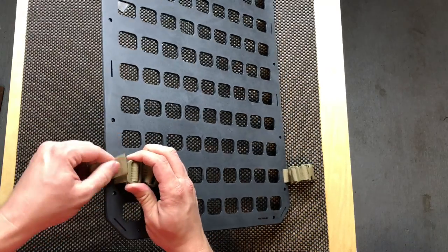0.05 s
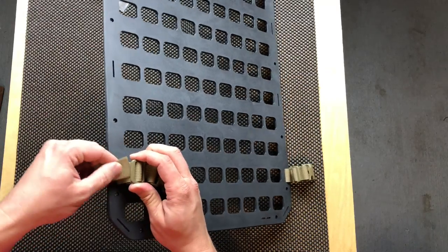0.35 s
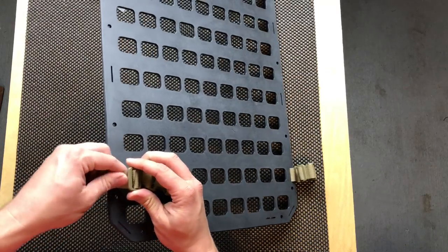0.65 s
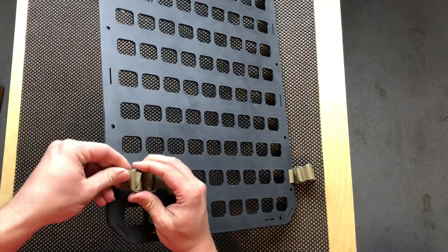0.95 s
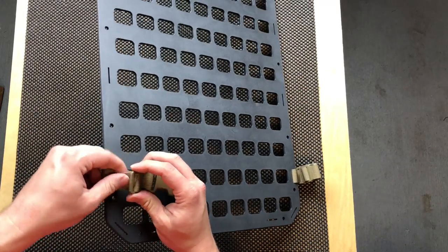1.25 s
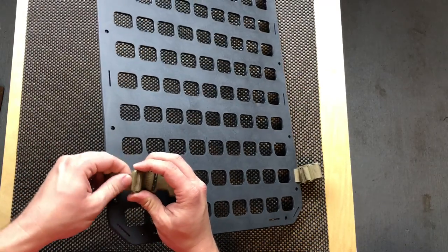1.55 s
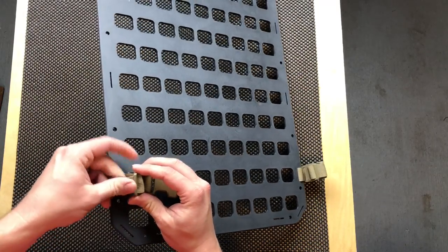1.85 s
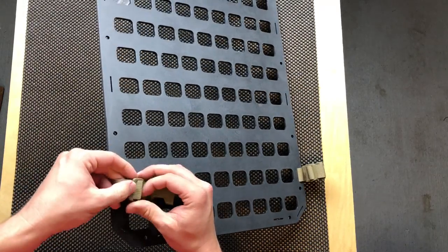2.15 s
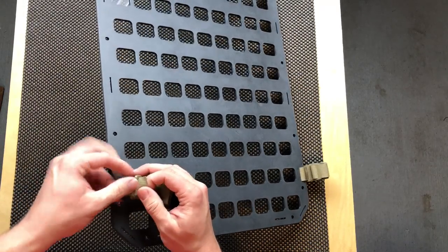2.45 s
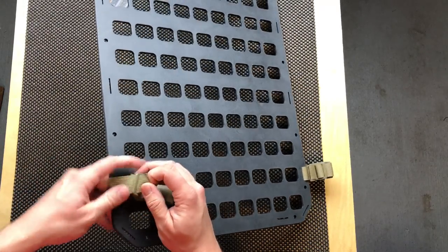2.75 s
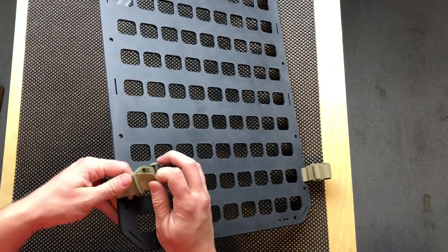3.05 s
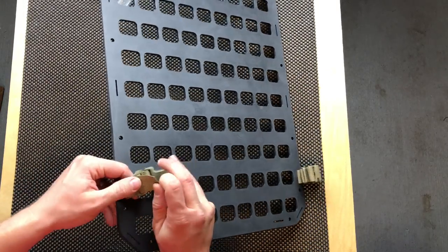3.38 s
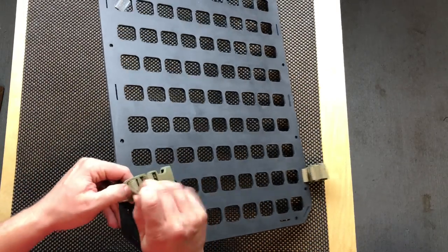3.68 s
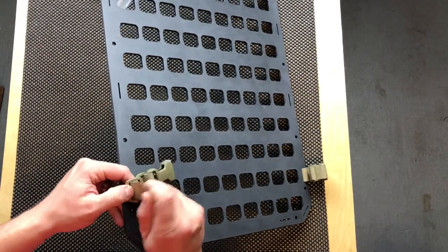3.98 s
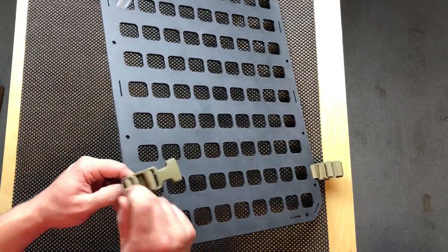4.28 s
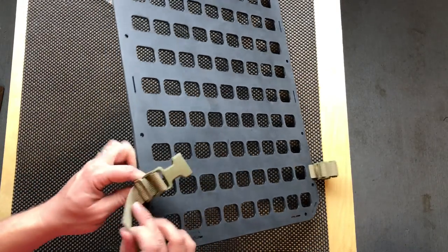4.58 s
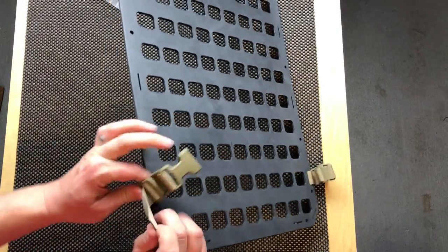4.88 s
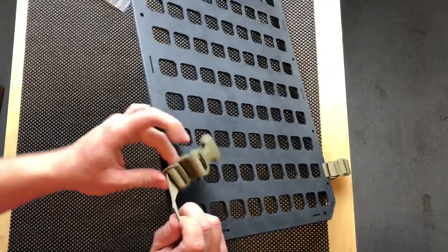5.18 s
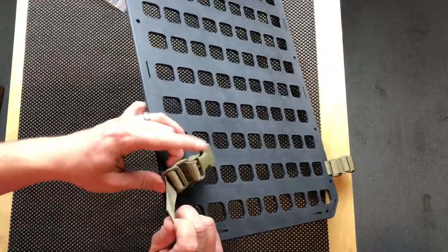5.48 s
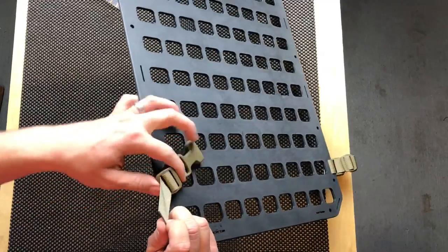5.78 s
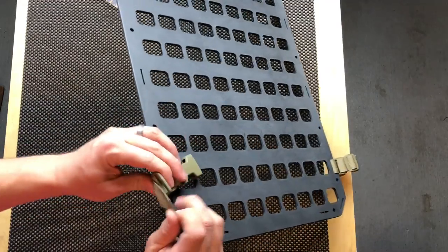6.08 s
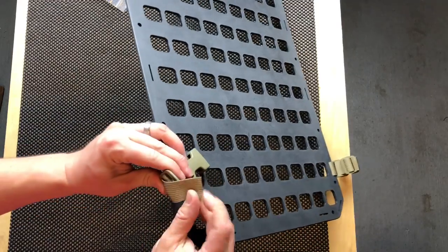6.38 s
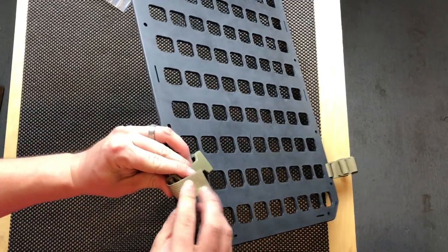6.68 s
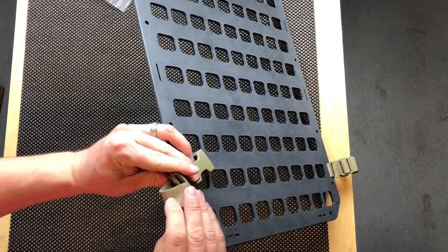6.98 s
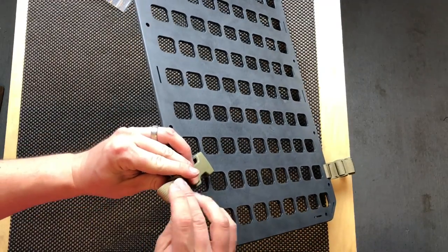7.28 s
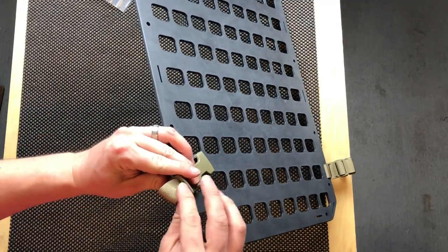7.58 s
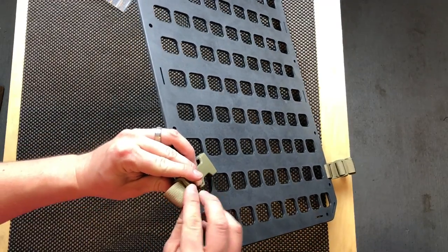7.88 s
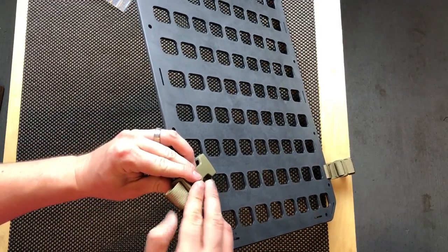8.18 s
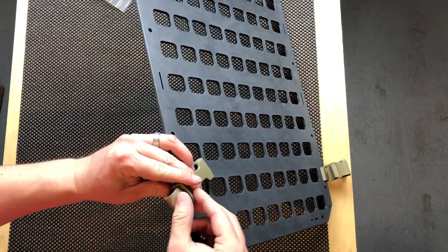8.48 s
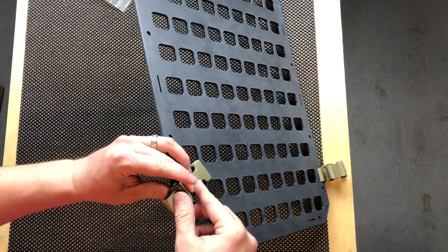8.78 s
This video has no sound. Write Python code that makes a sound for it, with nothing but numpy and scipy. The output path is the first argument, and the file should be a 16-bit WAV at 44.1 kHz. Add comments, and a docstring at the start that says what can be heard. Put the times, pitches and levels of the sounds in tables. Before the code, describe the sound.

Ventilation hums low and steady in a bare room while, close to the microphone, fingers work nylon webbing through a rigid panel. Brief scratchy slides and fingernail ticks come first. Midway, longer pulls mix with sharp plastic buckle clicks and dull knocks of the panel on a padded bench. The hardest knock comes about three quarters through, and the handling then thins to soft rustling and a few ticks.

```python
"""Ventilation hums throughout in a bare room that rings for about half a second.
Two hands start threading a nylon strap through a stiff, slotted panel on a padded bench: the webbing
rustles as its threads slip, and ticks where it or a fingernail catches an edge. From about 3.4 s the
panel rocks and knocks on the bench, and the strap's plastic buckle clicks against it.
The hardest knock lands near 6.7 s; faint rustles, ticks and one soft knock follow."""
import sys
import numpy as np
from scipy import signal
from scipy.fft import rfft, irfft, next_fast_len
from scipy.io import wavfile

SR = 44100
rng = np.random.default_rng(int(sys.argv[2]) if len(sys.argv) > 2 else 0)


def wrap_up_sound(samples):
    """Save the sound to the file named by the first command line argument, as 16-bit audio."""
    columns = np.atleast_2d(samples).T
    # keep every value between -1 and 1, then stretch to whole-number steps
    tamed = np.clip(columns, -1, 1)
    steps = np.round(tamed * 32767).astype(np.int16)
    wavfile.write(sys.argv[1], SR, steps)


N = 389844
AGE = np.arange(int(.4 * SR)) / SR  # seconds since a hit
CUTOFF_HZ = 16000


def amp(db):
    """Decibels to gain."""
    return 10 ** (np.asarray(db) / 20)


def rms_one(x):
    """Scale to rms 1."""
    return x / np.sqrt(np.mean(x ** 2) + 1e-20)


def in_time(rows):
    """A level curve's value at every sample."""
    times, levels = np.transpose(rows)
    return np.interp(np.arange(N) / SR, times, levels)


def at_hz(points, hz):
    """Read a table on a log-frequency axis."""
    f, value = np.transpose(points)
    return np.interp(np.log(np.maximum(hz, 1)), np.log(f), value)


def coloured(x, spectrum):
    """Minimum-phase EQ with this curve; white noise keeps its power."""
    size = 2 * next_fast_len(len(x))
    gain = rms_one(amp(at_hz(spectrum, np.fft.rfftfreq(size, 1 / SR))))
    cepstrum = irfft(np.log(gain))[:size // 2]
    cepstrum[1:] *= 2
    return irfft(rfft(x, size) * np.exp(rfft(cepstrum, size)))[:len(x)]


def butter(x, hz, kind, order=2):
    """Butterworth filter."""
    sections = signal.butter(order, np.clip(hz, 10, .45 * SR), kind, fs=SR, output="sos")
    return signal.sosfilt(sections, x)


def drift(per_s):
    """Random modulation of rms 1, gliding to a new value per_s times a second."""
    at = np.arange(N) / SR * per_s
    count = int(at[-1]) + 2
    return rms_one(np.interp(at, np.arange(count), rng.standard_normal(count)))


def fade(t60):
    """Exponential decay from 1, down 60 dB after t60 seconds."""
    return np.exp(-np.log(1000) * AGE / max(t60, 1e-3)) + 1e-18


def ring(hz, t60):
    """One struck mode."""
    return np.sin(2 * np.pi * hz * AGE) * fade(t60)


def burst(t60, evenness=0.62):
    """Countless modes struck at once: dying noise. Evenness 1 makes them all equally strong."""
    noise = rng.standard_normal(len(AGE)) * fade(t60)
    modes = rfft(noise)
    even = irfft(modes / np.abs(modes) ** evenness, len(AGE)) * fade(8 * t60)
    return rms_one(even) * np.std(noise)


def add(track, start_s, sound):
    """Mix a sound in at its cue."""
    start = int(start_s * SR)
    track[start:start + len(sound)] += sound[:N - start]


# The low rush of moving air. Each row: frequency in Hz, EQ gain in dB.
AIR_EQ = [(20, -24), (40, -6), (55, -2), (90, 5), (180, 1), (280, -3), (450, -11), (800, -16),
          (1300, -17.5), (2200, -26), (4200, -26.5), (8000, -32.5), (16000, -35)]
# The ventilation's steadier tones. Each row: pitch in Hz, rms level in dB, unsteadiness from 0 to 1.
HUM_TONES = [(70.6, -80, 0.71), (83.4, -72, 0.8), (120.3, -64, 0.39), (143.6, -66.5, 0.28),
             (171.7, -80.5, 0.8), (210.7, -75.5, 0.9)]
# The fan drone's swells and fades. Each row: time in seconds, level in dB.
DRONE_SWELLS = [(0.0, -65), (0.34, -57), (1.8, -69), (2.41, -59), (2.73, -70), (3.03, -56), (3.35, -75),
                (3.49, -60), (5.14, -55.5), (5.22, -61), (5.61, -50), (5.91, -62), (6.65, -56), (7.09, -72),
                (7.48, -53), (8.22, -66.5), (8.72, -53), (8.84, -55.5)]


def ventilation(drone_hz, drone_db, flutter_db, wander_rad):
    """The bed: a swelling fan drone and the ventilation's wavering tones over the rush of air."""
    turn = 2 * np.pi * np.arange(N) / SR
    out = amp(-63.5) * coloured(rng.standard_normal(N), AIR_EQ)
    for hz, db, unsteady in HUM_TONES:
        level = np.sqrt(2) * amp(db) * (1 + unsteady * drift(2.24) / 2)
        out += level * np.sin(hz * turn + 2 * unsteady * drift(2))
    swell = np.sqrt(2) * amp(drone_db + in_time(DRONE_SWELLS) + flutter_db * drift(6))
    return out + swell * np.sin(drone_hz * turn + wander_rad * drift(2.044))


# The bare room's reverb. Each row: frequency in Hz, 60 dB decay time in seconds.
ROOM_DECAY = [(100, 1), (400, 0.63), (1500, 0.58), (3000, 0.69), (6000, 0.6), (10000, 0.25), (16000, 0.45)]


def room(x, build_s, treble_db):
    """Reflections thicken after a few milliseconds and die sooner in the treble."""
    age = np.arange(SR) / SR
    tail = np.zeros(SR)
    edges = np.geomspace(100, 18000, 10)
    for low, high in zip(edges, edges[1:]):
        band = butter(rng.standard_normal(SR), [low, high], "band", order=3)
        hz = np.sqrt(low * high)
        decay = np.exp(-np.log(1000) * age / at_hz(ROOM_DECAY, hz))
        tail += band * amp(treble_db * hz / CUTOFF_HZ) * decay
    tail *= 1 - np.exp(-(age / build_s) ** 2)
    return signal.fftconvolve(x, rms_one(tail) / np.sqrt(SR))[:N]


def fibres(per_s, grain_db, hiss_db):
    """Threads slip one by one: tiny clicks of uneven size over a smooth hiss."""
    sizes = amp(grain_db * np.minimum(rng.exponential(1, N), 4)) * rng.choice([-1, 1], N)
    grains = rms_one(sizes * (rng.random(N) < per_s / SR))
    return rms_one(grains + amp(hiss_db) * rng.standard_normal(N))


def weave(patchy_db, judder_db):
    """The patch in contact keeps changing, so each band flickers while the whole strap judders."""
    edges = np.geomspace(300, 18000, 11)
    slips = [fibres(per_s=2500, grain_db=4.2, hiss_db=-3) for _ in range(2)]
    bands = [butter(slips[k % 2], [low, high], "band") * amp(patchy_db * drift(45))
             for k, (low, high) in enumerate(zip(edges, edges[1:]))]
    return rms_one(sum(bands) * amp(judder_db * drift(180)))


# The tone of webbing on plastic and skin. Each row: frequency in Hz, EQ gain in dB.
WEBBING_EQ = [(150, -15.5), (600, 0), (1500, -1.5), (2500, -1), (4000, 0.5), (5800, 0.5), (7500, -2),
              (10000, -6.5), (13000, -7), (16000, -7)]
# Fingers working the webbing between strokes. Each row: time in seconds, level in dB.
FIDGET_LEVELS = [(0, -75), (2.1, -77), (2.7, -68.5), (3.4, -73.5), (4.7, -77.5), (6.0, -70.5), (6.9, -74.5),
                 (8.84, -82)]
# Slides of the strap. Each row: fastest moment in seconds, length in seconds, level in dB,
# brightness tilt in dB per octave.
STRAP_STROKES = [(0.13, 0.074, -59, -4), (0.813, 0.13, -61, 3), (1.172, 0.1, -67.5, -0.5),
                 (1.323, 0.063, -66.5, 3), (1.596, 0.058, -66, 2), (1.853, 0.054, -65, 4),
                 (2.529, 0.097, -57.5, 1.5), (2.876, .11, -60.5, 1), (3.106, 0.077, -64.5, 3),
                 (3.523, 0.28, -69.5, -3), (4.17, 0.16, -61.5, -3.5), (4.402, 0.21, -70.5, -0.5),
                 (4.697, 0.4, -62.5, -0.5), (4.973, 0.32, -57.5, -3.5), (5.169, 0.3, -66.5, -2),
                 (5.42, 0.25, -55.5, -4.5), (5.648, 0.15, -60.5, -6), (6.372, 0.041, -63.5, 1),
                 (6.523, 0.073, -64.5, 2.5), (7.043, .12, -66.5, -0.5), (7.271, 0.071, -69.5, 3),
                 (7.573, 0.054, -63.5, 0.5), (8.085, 0.14, -70.5, 1), (8.523, .07, -70.5, -1.5)]


def strap(level_db, swell_power, pivot_hz, fidget_swing_db, fidgets_per_s):
    """Webbing slides, louder the faster it goes; between strokes it shifts faintly under the fingers."""
    threads = weave(patchy_db=2.0, judder_db=1.9)
    fidget = amp(in_time(FIDGET_LEVELS) + fidget_swing_db * drift(fidgets_per_s))
    out = fidget * coloured(threads, WEBBING_EQ)
    for peak_s, length, db, tilt in STRAP_STROKES:
        start = max(peak_s - length / 2, 0)
        at = np.arange(int(start * SR), min(int((start + length) * SR), N))
        speed = np.interp(at / SR, [start, peak_s, start + length], [0, 1, 0])
        tilted_eq = [(hz, eq_db + tilt * np.log2(hz / pivot_hz)) for hz, eq_db in WEBBING_EQ]
        add(out, start, amp(db + level_db) * speed ** swell_power * coloured(threads[at], tilted_eq))
    return out


def snags(above_db, scatter_db, hz, t60):
    """Tick cues: each stroke catches faintly once, at a chance moment near its fastest."""
    return [(peak_s + length * (rng.random() - .5) / 2,
             db + above_db + scatter_db * rng.standard_normal(), hz, t60)
            for peak_s, length, db, _ in STRAP_STROKES]


# Webbing and fingernails catching on edges. Each row: start in seconds, level in dB,
# band centre in Hz, scuff decay time in seconds.
EDGE_CATCHES = [(0.178, -41, 2830, 0.12), (0.2523, -46, 3250, 0.069), (0.4831, -31, 4400, 0.0062),
                (0.5021, -42, 3430, 0.013), (0.5149, -27.5, 3440, 0.002), (0.5268, -35.5, 3400, 0.0019),
                (0.548, -40, 4000, 0.0067), (0.6738, -35, 7500, 0.0054), (1.0163, -52.5, 2500, 0.023),
                (1.8818, -50, 3800, 0.041), (1.919, -53, 4500, 0.034), (1.982, -53.5, 4000, .018),
                (2.768, -44.5, 7200, 0.086), (3.440, -45, 4000, 0.12), (4.131, -41.5, 4000, .028),
                (4.193, -49, 4200, .025), (4.971, -33, 7700, 0.076), (5.322, -35, 3200, 0.089),
                (5.361, -38, 3580, 0.016), (5.384, -34.5, 3220, 0.059), (6.002, -38, 3300, 0.035),
                (7.3111, -39.5, 4000, 0.027), (7.872, -50, 4800, 0.0083), (8.108, -52, 4500, 0.025),
                (8.4406, -46, 4800, 0.025)]
# The buckle's modes, damped by fingers. Each row: pitch in Hz, gain in dB, decay time in seconds.
HELD_BUCKLE_MODES = [(1190, -47, 0.016), (1800, -36.5, 0.017), (2755, -36.5, 0.024), (3200, -47, .012),
                     (3990, -37.5, 0.024)]
# The tone all ticks share. Each row: frequency in Hz, EQ gain in dB.
TICK_EQ = [(150, -26), (500, -9), (1000, 0.5), (1600, -5), (3200, -1), (4500, -1), (6300, -5), (8200, -6),
           (11000, -8), (16000, -5.5)]


def ticks(level_db, band_spread, edge_db, release_db, scuff_db):
    """Each catch lets go with one sharp snap and a short, duller scuff; the held buckle colours both."""
    out = np.zeros(N)
    snap = amp(release_db) * (AGE == 0)
    for start, db, hz, t60 in EDGE_CATCHES + snags(above_db=5.5, scatter_db=3, hz=4500, t60=0.026):
        band_hz = [hz / (1 + band_spread), hz * (1 + band_spread)]
        catch = butter(snap + amp(scuff_db) * burst(t60), band_hz, "band", order=1)
        add(out, start, amp(db) * (catch + amp(edge_db) * snap))
    body = sum(amp(db) * ring(hz, t60) for hz, db, t60 in HELD_BUCKLE_MODES)
    return amp(level_db) * coloured(out + signal.fftconvolve(out, body)[:N], TICK_EQ)


# The buckle's three main rings. Each row: pitch in Hz, level in dB, decay time in seconds.
BUCKLE_MODES = [(2570, -4, .058), (4400, -4, .033), (5920, -2.5, .024)]
# Its faint upper rings. Each row: pitch in Hz, level in dB, decay time in seconds.
BUCKLE_OVERTONES = [(7750, -21, .04), (8950, -18, .035), (10250, -14, .015), (14850, -13, .02)]
# The crack of hard plastic. Each row: frequency in Hz, EQ gain in dB.
CRACK_EQ = [(150, -16), (400, -6), (800, -6.5), (1300, -1.5), (1800, -3), (2200, -9.5), (3700, -4),
            (5000, -8), (7700, -9.5), (10200, -8.5), (12500, -12.5), (15000, -8.5)]
# The buckle hitting the panel. Each row: start in seconds, level in dB, contact cut-off in Hz,
# pitch ratio under the grip, then a trim in dB for each of the three main rings.
BUCKLE_CLICKS = [(3.6855, -25.5, 15000, 1, -0.5, -16, -3.5), (3.7144, -36, 7000, 1.16, -9, -14, -10),
                 (3.88, -31, 4000, 1.02, -11, -17, -15), (5.7157, -21, 5350, 1.01, -19, -14, -0.5),
                 (6.0994, -28, 15500, 1, -2.5, -0.5, -12), (6.6499, -36.5, 4000, 0.96, -17, -24, 6)]


def buckle(crack_db, crack_t60, linger_db, linger_t60, overtones_db):
    """A short crack and three rings, balanced by where the buckle is hit; a faint part rings on."""
    out = np.zeros(N)
    overtones = sum(amp(db + overtones_db) * ring(hz, t60) for hz, db, t60 in BUCKLE_OVERTONES)
    for start, db, contact_hz, grip, *trims_db in BUCKLE_CLICKS:
        rings = np.zeros(len(AGE))
        for (hz, mode_db, t60), trim_db in zip(BUCKLE_MODES, trims_db):
            linger = amp(linger_db) * ring(hz * grip, linger_t60)
            rings += amp(mode_db + trim_db) * (ring(hz * grip, t60) + linger)
        crack = amp(crack_db) * coloured(burst(crack_t60), CRACK_EQ)
        attack = butter(crack + overtones, contact_hz, "low", order=1)
        add(out, start, amp(db) * (rings + attack))
    return out


# The panel's body. Each row: pitch in Hz, level in dB, decay time in seconds before contact scales it.
PANEL_MODES = [(242, -23, .12), (320, -12, .17), (396, -14, .18), (424, -9.5, .18), (452, -6, .06),
               (625, -11, .18), (742, -11, .1), (824, -.5, .1), (990, -12, .08), (1047, -11, .1),
               (1170, -9, .05), (1415, -4, .055), (1560, -6, .04), (1680, -7, .045), (1810, -5, .05),
               (2215, -11, .025)]
# The clatter of its dense, quickly damped modes. Each row: frequency in Hz, EQ gain in dB.
CLATTER_EQ = [(120, -36), (350, -3), (900, -4), (1600, -3.5), (2300, -6.5), (3000, -12), (5000, -12),
              (9000, -3), (16000, -10.5)]
# The panel landing on the bench. Each row: start in seconds, level in dB, contact cut-off in Hz.
PANEL_KNOCKS = [(0.178, -46, 4000), (3.431, -42, 1130), (3.684, -45, 1800), (4.565, -37.5, 880),
                (4.596, -41.5, 1030), (4.910, -38.5, 900), (5.048, -31.5, 910), (5.060, -36, 1250),
                (5.263, -46, 890), (5.424, -41.5, 1070), (5.458, -45.5, 1500), (5.909, -31.5, 2040),
                (6.128, -39, 945), (6.2868, -30.5, 1290), (6.6507, -21.5, 3870), (8.384, -50, 560)]


def panel(modes_db, clatter_db, clatter_t60, scatter_db, neutral_contact_hz):
    """The panel drops on the bench; a softer contact wakes fewer modes and lets them ring longer."""
    out = np.zeros(N)
    for start, db, contact_hz in PANEL_KNOCKS:
        # A harder landing presses the panel into the padding and shortens its ring.
        stretch = (neutral_contact_hz / contact_hz) ** 0.31
        modes = sum((-1) ** k * amp(mode_db + scatter_db * rng.standard_normal()) * ring(hz, t60 * stretch)
                    for k, (hz, mode_db, t60) in enumerate(PANEL_MODES))
        clatter = amp(clatter_db) * coloured(burst(clatter_t60 * stretch), CLATTER_EQ)
        knock = butter(amp(modes_db) * modes + clatter, contact_hz, "low", order=4)
        add(out, start, amp(db) * knock)
    return out


def scene():
    """The mix: the wide panel fills the room more than the small parts close to the microphone."""
    knocks = panel(modes_db=-5.5, clatter_db=5, clatter_t60=0.059, scatter_db=2, neutral_contact_hz=1900)
    clicks = buckle(crack_db=-2, crack_t60=0.028, linger_db=-30, linger_t60=0.16, overtones_db=0.5)
    catches = ticks(level_db=0.5, band_spread=0.47, edge_db=-4.5, release_db=6.5, scuff_db=-2)
    rustle = strap(level_db=0.5, swell_power=0.68, pivot_hz=4000, fidget_swing_db=1, fidgets_per_s=19)
    send = amp(-3.5) * knocks + amp(-9) * clicks + amp(-11.5) * catches + amp(-14.5) * rustle
    reverb = room(send, build_s=0.0023, treble_db=2.5)
    bed = ventilation(drone_hz=104, drone_db=-0.5, flutter_db=0.7, wander_rad=0.45)
    return (knocks + clicks + catches + rustle + reverb + bed)[None]


def record(dry):
    """A steep low-pass takes off the very top."""
    return signal.sosfilt(signal.ellip(10, .1, 80, CUTOFF_HZ, fs=SR, output="sos"), dry)


dry = scene()
out = record(dry)
wrap_up_sound(out)
```